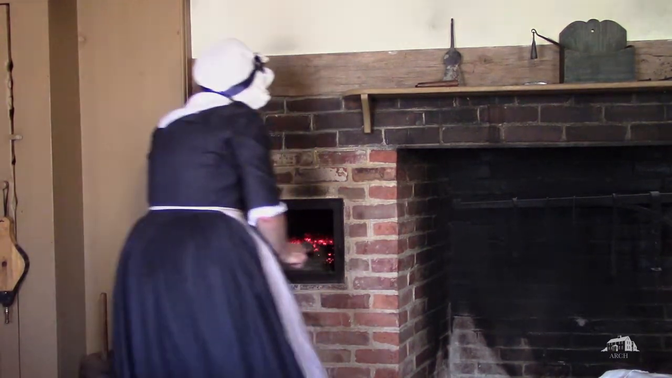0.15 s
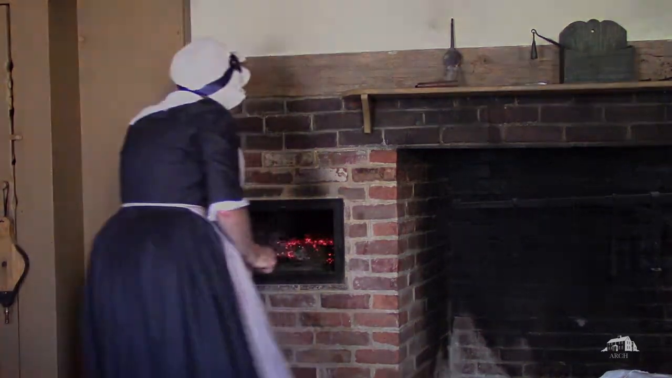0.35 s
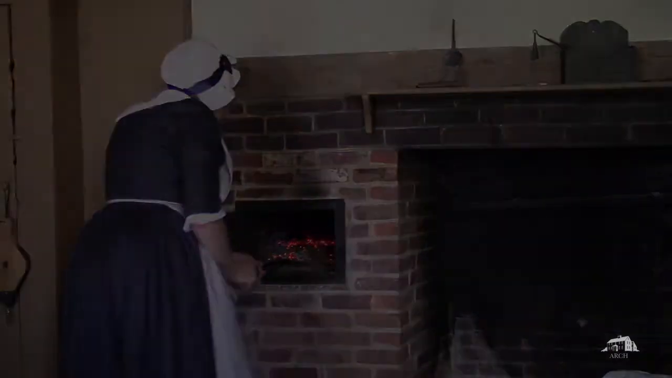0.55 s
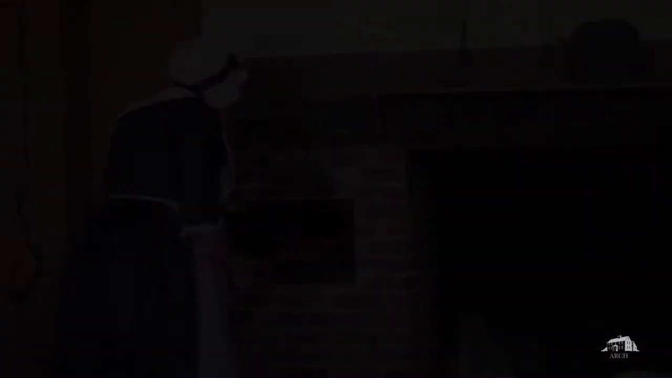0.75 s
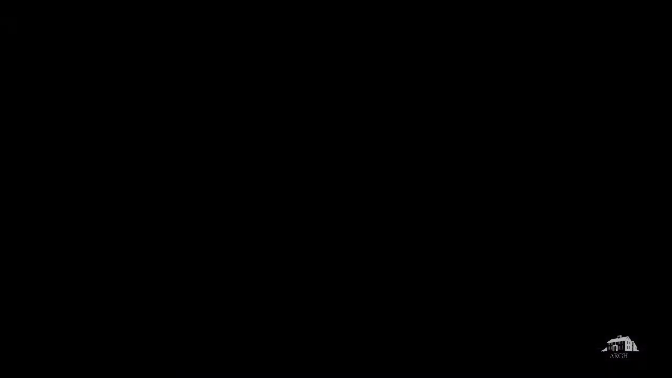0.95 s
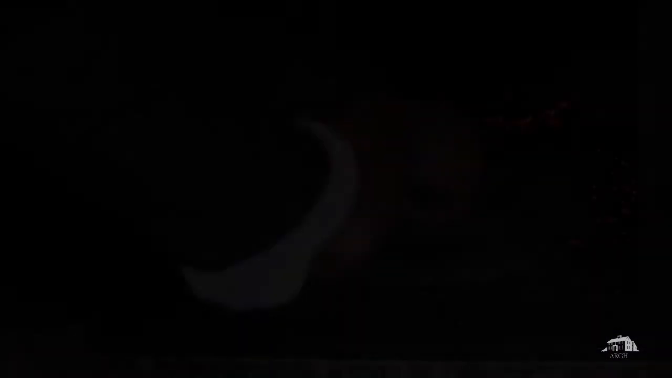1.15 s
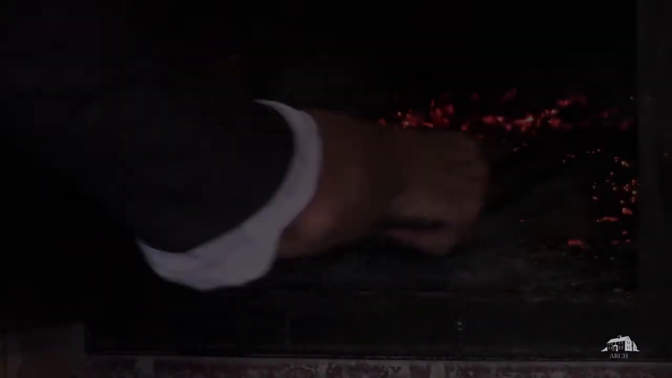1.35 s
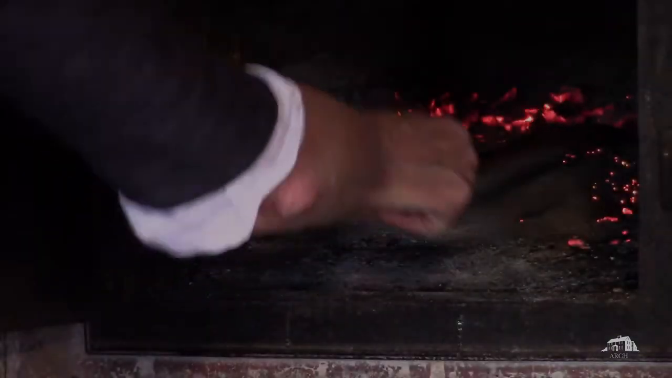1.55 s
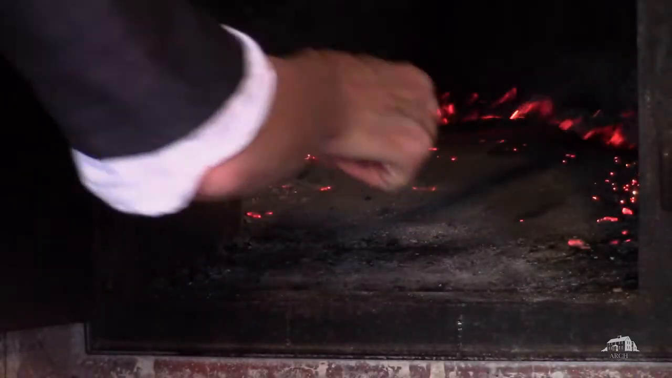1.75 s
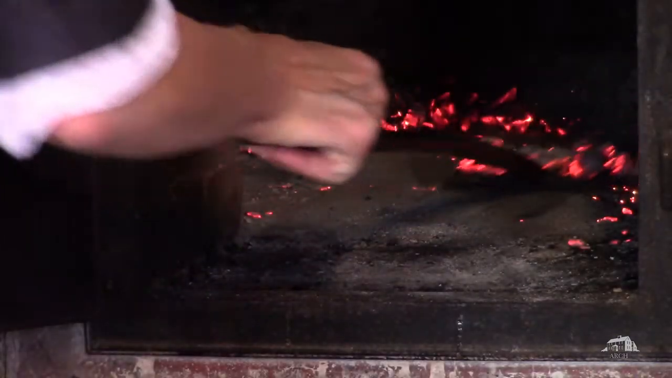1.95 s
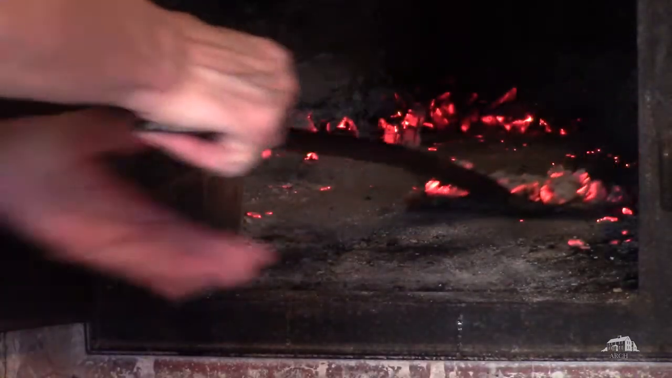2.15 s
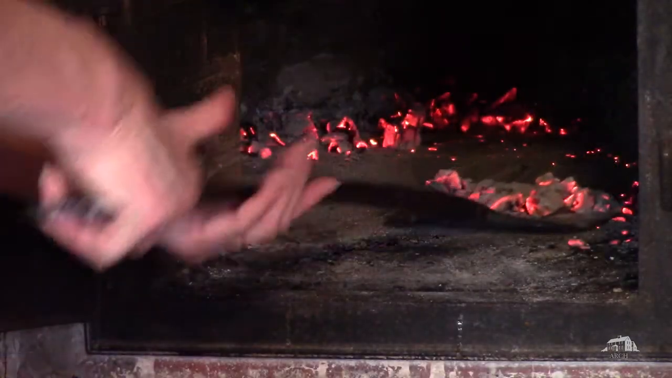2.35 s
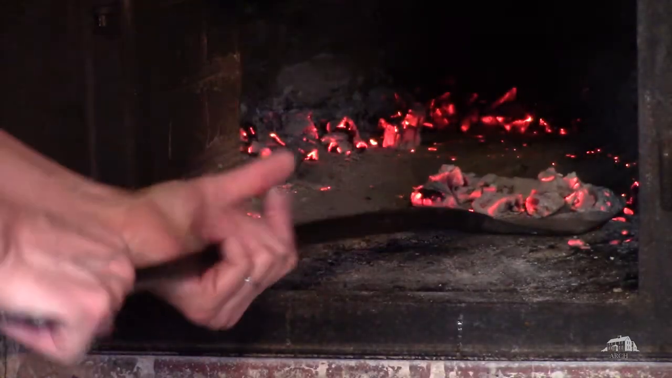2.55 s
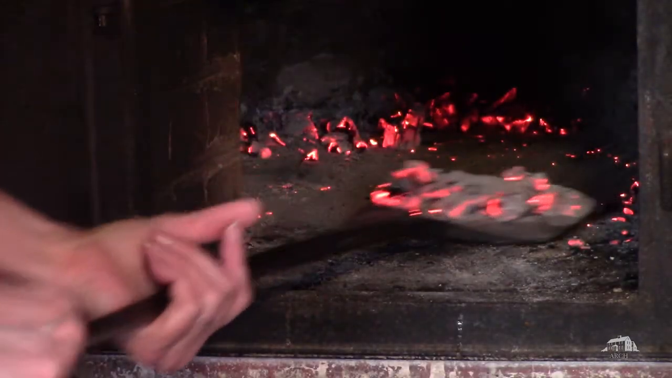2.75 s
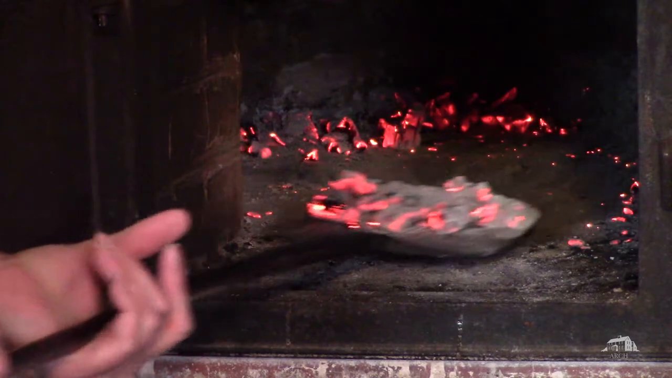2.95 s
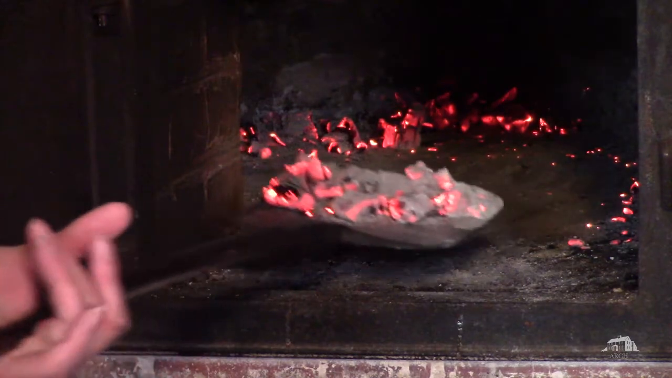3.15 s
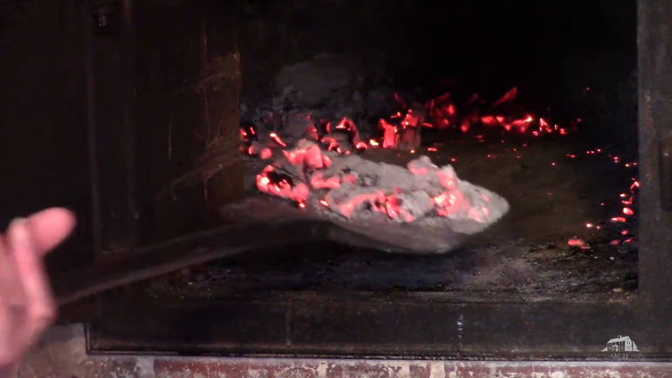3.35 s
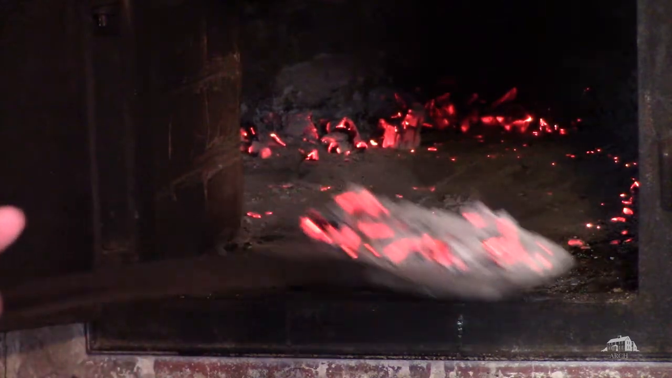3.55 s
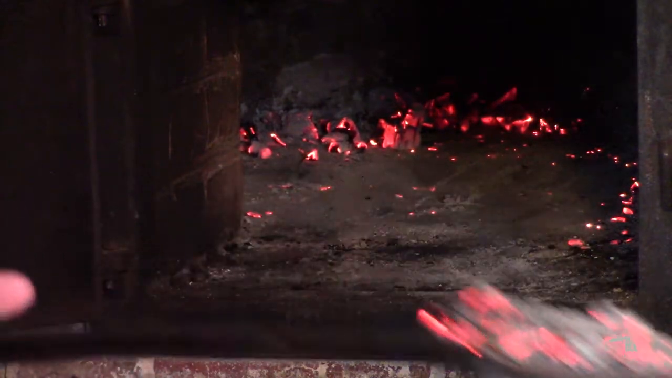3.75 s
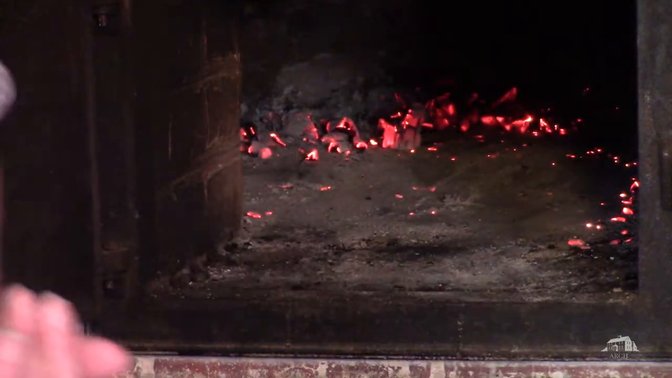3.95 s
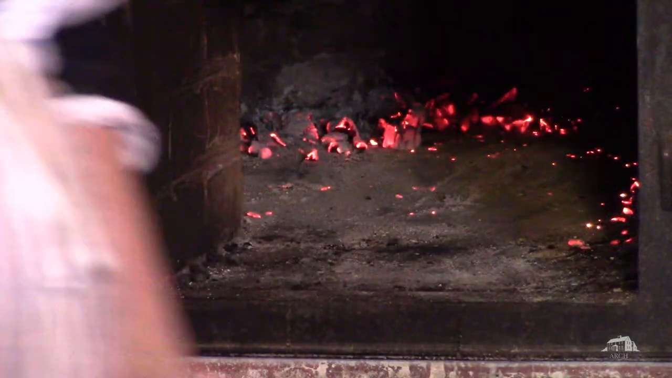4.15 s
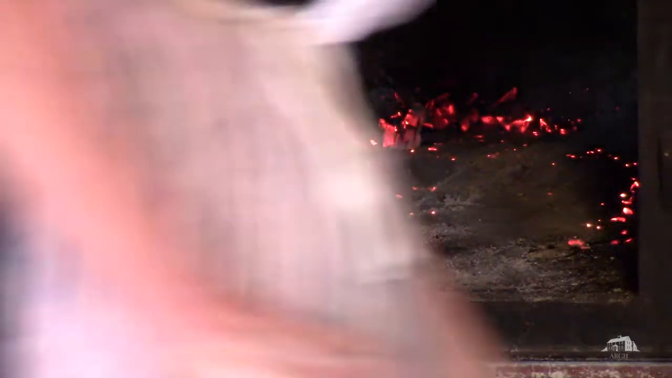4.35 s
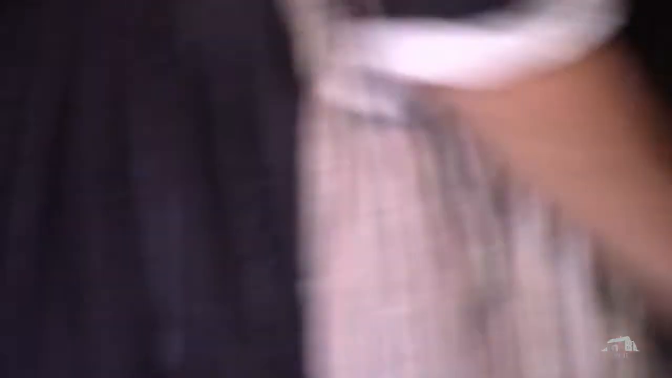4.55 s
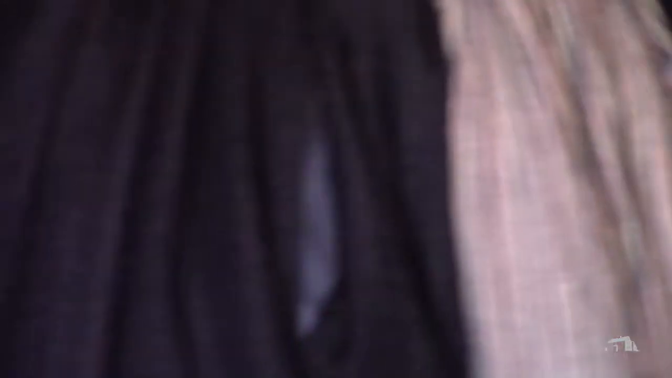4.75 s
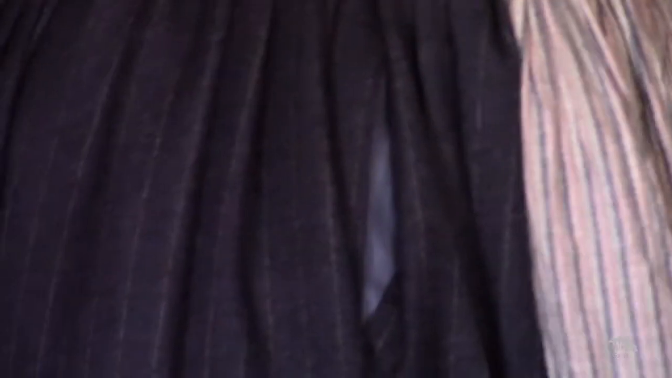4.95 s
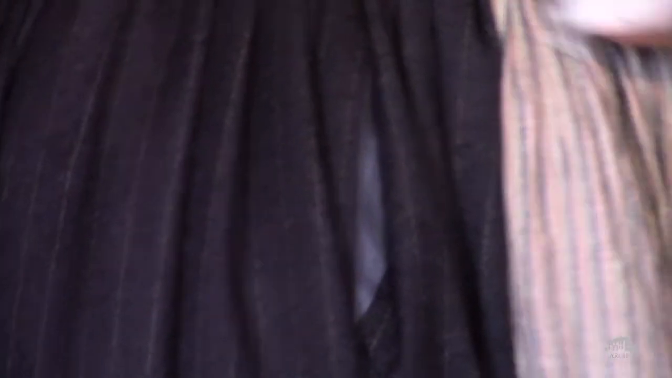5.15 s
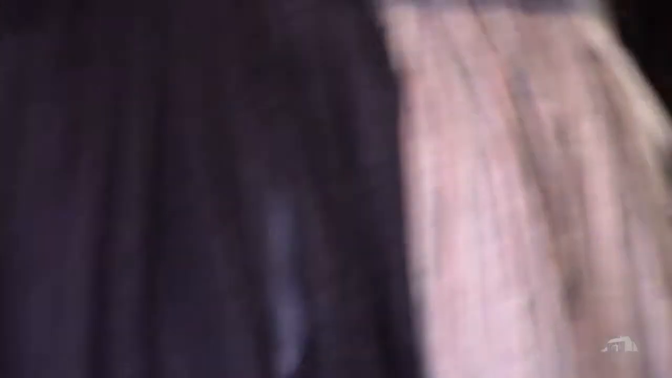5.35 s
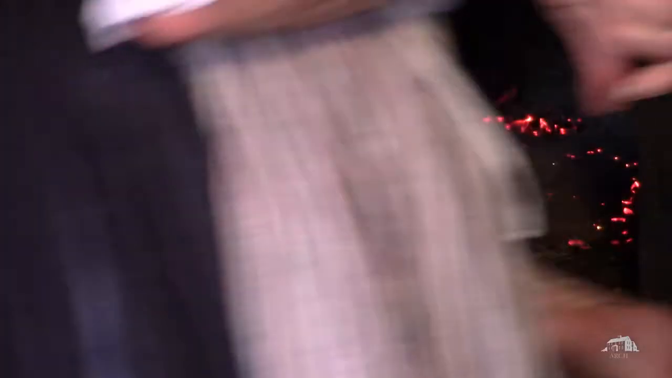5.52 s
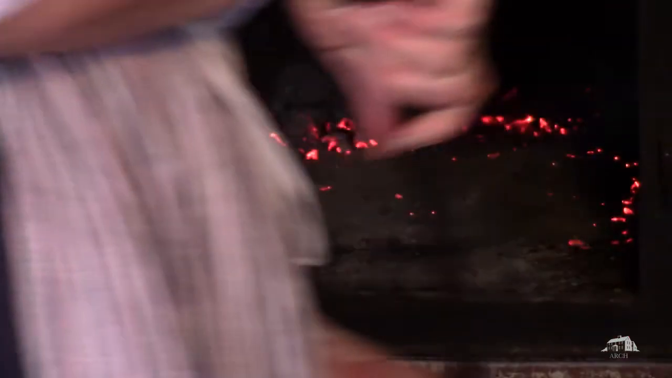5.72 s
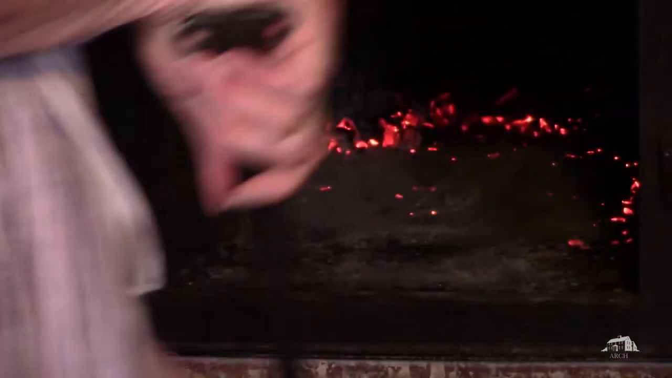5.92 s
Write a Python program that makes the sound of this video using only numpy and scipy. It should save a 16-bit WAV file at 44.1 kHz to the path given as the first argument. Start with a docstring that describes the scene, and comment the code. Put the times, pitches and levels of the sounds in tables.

```python
"""A footfall and a brief coal slide come first; then an iron shovel knocks and scrapes over a bread oven's
brick floor, feeding its plate modes with friction and blows until about 2.8 s. It is lifted out:
embers tick, coals are tipped off with a gritty rush of noise, shoes knock on floorboards.
Faint random ember ticks and steady room noise run throughout; a small kitchen answers with decaying noise.
A single microphone with little bass hears it all."""
import sys
import numpy as np
from scipy import signal
from scipy.fft import rfft, irfft, next_fast_len
from scipy.io import wavfile
from scipy.ndimage import map_coordinates

SR = 44100
rng = np.random.default_rng(int(sys.argv[2]) if len(sys.argv) > 2 else 0)


def store_wav(level_fs):
    """Save 16-bit WAV to argv[1]."""
    pcm = np.round(np.clip(np.atleast_2d(level_fs), -1, 1) * 32767)
    wavfile.write(sys.argv[1], SR, pcm.T.astype(np.int16))


def voltage_ratio(decibels):
    """Convert decibels (scalar or array-like) to amplitude ratios, 20 dB per decade."""
    exponent = np.asarray(decibels, float) / 20
    return 10 ** exponent


N = 268128


def unit(x):
    """Scaled to rms 1."""
    return x / np.sqrt(np.mean(x ** 2) + 1e-20)


def along(points, hz):
    """(Hz, value) points interpolated on a log frequency axis."""
    f, v = np.transpose(points)
    return np.interp(np.log(hz + 1), np.log(f + 1), v)


def wobble(knots_per_s, size=N):
    """Random curve: normal knots joined by straight lines."""
    knots = rng.standard_normal(int(size * knots_per_s / SR) + 4)
    return map_coordinates(knots, [np.arange(size) * knots_per_s / SR], order=1)


def coloured(spectrum, envelope):
    """White noise under an envelope, filtered by the spectrum at unit rms gain."""
    m = next_fast_len(N + 8192)
    gain = voltage_ratio(along(spectrum, np.fft.rfftfreq(m, 1 / SR)))
    noise = envelope * rng.standard_normal(N)
    return irfft(rfft(noise, m) * unit(gain), m)[:N]


def resonate(x, hz, width_hz):
    """One fixed mode; white noise of rms 1 leaves with rms 1."""
    r = np.exp(-np.pi * max(width_hz, 3) / SR)
    poles = [1, -2 * r * np.cos(2 * np.pi * hz / SR), r * r]
    return np.sqrt((1 - r * r) / 2) * signal.lfilter([1, 0, -1], poles, x)


def sliding_mode(x, hz, width_hz):
    """One mode with pitch given per sample; white noise of rms 1 leaves with rms 1."""
    r = np.exp(-np.pi * width_hz / SR)
    turn = np.exp(2j * np.pi * np.cumsum(hz) / SR)
    baseband = signal.lfilter([1], [1, -r], x * turn.conj())
    return np.sqrt(2 * (1 - r * r)) * (baseband * turn).real


def burst(t60_s, attack_s):
    """Noise that starts quickly and dies away exponentially."""
    t = np.arange(SR // 4) / SR
    return rng.standard_normal(len(t)) * voltage_ratio(-60 * t / t60_s) * (1 - np.exp(-t / attack_s))


def add(track, s, sound):
    """Mixes a sound into the track at time s."""
    part = track[round(s * SR):][:len(sound)]
    part += sound[:len(part)]


def above(hz, x):
    """Third-order high-pass."""
    return signal.sosfilt(signal.butter(3, hz, "high", fs=SR, output="sos"), x)


def peak(s, db, rise_db_per_s, fall_db_per_s, hold_s=0):
    """Level in dB that climbs to db at time s, holds, then sinks."""
    t = np.arange(N) / SR - s
    rise = rise_db_per_s * np.minimum(t, 0)
    fall = fall_db_per_s * np.maximum(t - hold_s, 0)
    return np.maximum(db + rise - fall, -120)


# shovel plate modes: [f/Hz, level/dB, gain per pressure/(dB/dB)]
BLADE_MODES = [(300, -18, -0.43), (390, -18.5, 0.18), (470.4, -12, -0.1), (616, -19.5, -0.43),
               (818, -10, 0), (1171, -12, 0.5), (1340, -6, -0.07), (1490, -9.5, 0.25), (1745, -5, -0.08),
               (2061, -7.5, 0.05), (2446, -11.5, 0.5), (2610, -7.5, 0.05), (3010, -9.5, 0),
               (3340, -11, 0.3), (3845, -10.5, 0.29), (3945, -7.5, 0.06), (4238, -10.5, -0.07),
               (4724, -10, 0.03), (5677, -5.5, 0.29), (5940, -9.5, -0.07), (6515, -15, 0.5),
               (6910, -15.5, 0.14), (7830, -13.5, -0.06), (8760, -14.5, 0.4), (9604, -12, 0.09),
               (10500, -18, -0.2)]
# blade strikes brick: [t/s, level/dB, dullness/dB]
BLOWS = [(0.312, -10, 6), (0.8738, -8.5, -17), (0.9393, -16.5, -14), (1.113, -32.5, 1.5),
         (1.4432, -30.5, -5), (1.813, -27.5, -2), (1.8333, -14, 2), (1.9926, -7.5, -10), (2.038, -17, -11),
         (2.068, -14, -9), (2.098, -11, -6), (2.178, -12, -7.5), (2.568, -27, -14), (2.58, -26, -3),
         (2.647, -34, -6.5), (2.659, -27, -10.5)]
# brick under iron: [f/Hz, relative density/dB]
GRIT_SPECTRUM = [(180, -48), (300, -15), (500, -3.5), (1500, 0), (3300, -8.5), (9000, -17), (16000, -30.5)]


def shovel():
    """Friction and blows feed every mode; the touching edge wanders, so each mode swells on its own."""
    lifted_s = 3.1
    end = round(lifted_s * SR)
    pressure_db, dull_db = (control[:end] for control in contact())
    # the edge catches on brick grains and crushes coal crumbs
    roughness = unit(voltage_ratio(wobble(70, size=end) + 2.64 * wobble(500, size=end)))
    catching = unit(roughness + 0.85 * crumbs(end))
    # weaker modes crowd between the strong ones
    lower_hz = np.linspace(930, 2300, num=12) + rng.uniform(-45, 47, size=12)
    crowd_hz = np.append(lower_hz, rng.uniform(2300, 15800, size=70))
    crowd = [(hz, min(along(GRIT_SPECTRUM, hz) - 5, -16), 0) for hz in crowd_hz]
    ring = np.zeros(end)
    for hz, db, favour in BLADE_MODES + crowd:
        low = 1 / (1 + (hz / 2200) ** 3)  # share of the dullness this mode feels
        # pressing hard bends the blade towards other modes
        drive_db = pressure_db + favour * (pressure_db + 28.5) + low * (dull_db - 3.5)
        wander_db = 3.6 * wobble(45, size=end) + 2.0 * wobble(11, size=end)
        force = voltage_ratio(drive_db + wander_db - 6.5) * catching * rng.standard_normal(end)
        for s, blow_level_db, blow_dull_db in BLOWS:
            blow_db = blow_level_db + favour * (blow_level_db + 12.5) + low * blow_dull_db
            blow_db += 2.4 * rng.standard_normal()
            add(force, s, voltage_ratio(blow_db - 2.5) * burst(t60_s=0.0088, attack_s=0.00017))
        # low modes slide in pitch as the loaded blade flexes
        pitch_hz = hz * (1 + 0.014 * low * wobble(9, size=end))
        width_hz = 20 + 0.0009 * hz  # higher modes lose energy faster
        ring += voltage_ratio(db) * sliding_mode(force, pitch_hz, width_hz)
    rubbing = voltage_ratio(pressure_db + 0.59 * dull_db - 7.0) * catching
    struck = np.pad(ring + floor_thud(end), (0, N - end))
    scrape = coloured(GRIT_SPECTRUM, np.pad(rubbing, (0, N - end)))
    return above(262, struck + scrape)  # a thin blade radiates no bass


def floor_thud(size):
    """The oven floor takes each blow: a noise burst through one broad resonance."""
    thud = np.zeros(size)
    for s, db, dull_db in BLOWS:
        add(thud, s, voltage_ratio(db + 0.7 * dull_db - 21.0) * burst(t60_s=0.3, attack_s=0.0014))
    return resonate(thud, hz=480, width_hz=194)


def crumbs(size):
    """Force envelope of separate grains: sudden, short, of very unequal size."""
    grains_per_s, decay_s = 300, 0.001
    hit = rng.random(size) < grains_per_s / SR
    strength = rng.exponential(size=size)
    return unit(signal.lfilter([1], [1, -np.exp(-1 / (decay_s * SR))], hit * voltage_ratio(4.6 * strength)))


# blade dragged on brick, one table a stroke: [t/s, level/dB]
DRAG_STROKES = [
    [(.315, -46), (.37, -45), (.44, -39), (.58, -51.5), (.66, -59)],
    [(.877, -31), (.94, -38), (1.0, -45.5), (1.13, -54), (1.26, -52.5), (1.34, -58)],
    [(1.445, -66), (1.56, -49), (1.6, -45), (1.8, -44), (1.82, -30.5), (1.97, -37.5), (2.04, -23.5),
     (2.16, -29), (2.2, -24), (2.3, -25.5), (2.355, -23), (2.405, -37), (2.5, -41), (2.56, -56.5),
     (2.8, -59.5)],
]


def drag():
    """Drag pressure in dB per sample: interpolated within strokes, silent between them."""
    t = np.arange(N) / SR
    s, db = np.transpose(np.concatenate(DRAG_STROKES))
    touching = sum((t >= rows[0][0]) & (t <= rows[-1][0]) for rows in DRAG_STROKES) > 0
    return np.where(touching, np.interp(t, s, db), -120)


# the edge digs in for a moment: [t/s, level/dB, dullness/dB]
DIGS = [(0.269, -40, -10), (0.393, -32.5, 10), (1.181, -36.5, 8.5), (1.594, -36, 5.5), (1.69, -36, -4),
        (1.728, -35.5, -1.5), (1.852, -20, 3.5), (1.949, -31, 16.5), (2.056, -21.5, -1),
        (2.079, -15, -13.5), (2.131, -14.5, -5), (2.682, -44, 16)]


def contact():
    """Pressure and dullness of the edge: drag, digs and skids add powers, the strongest sets the colour."""
    drag_db = drag()
    parts = [(drag_db, 3.5 - 0.2249 * (drag_db + 41))]  # harder is brighter
    for s, db, dull_db in DIGS:
        parts.append((peak(s, db, rise_db_per_s=449, fall_db_per_s=558), dull_db))
    for s, db, dull_db in BLOWS:  # after each blow the blade skids on
        parts.append((peak(s, db - 11.5, rise_db_per_s=SR, fall_db_per_s=491), dull_db))
    power = sum(voltage_ratio(2 * db) for db, dull_db in parts)
    dullness_db = sum(voltage_ratio(2 * db) * dull_db for db, dull_db in parts) / power
    return 10 * np.log10(power), dullness_db


# the edge sticks and slips in step with one mode: [t/s, f/Hz, level/dB]
SQUEALS = [(.313, 5677, -27), (0.319, 1340, -23), (.32, 1745, -23.5), (.317, 515, -28), (.38, 5677, -37.5),
           (.685, 2606, -51), (.9, 390, -37), (.874, 3945, -36), (0.875, 2610, -31), (.937, 5677, -34),
           (.948, 3945, -31), (1.17, 818, -41), (1.175, 1745, -42), (1.455, 2610, -48.5), (1.59, 4310, -44),
           (1.833, 1745, -22.5), (1.833, 1490, -25), (1.845, 5677, -22), (2.06, 5677, -19),
           (2.068, 3945, -19), (2.128, 8760, -28.5), (2.575, 3010, -43), (2.58, 4320, -48.5),
           (2.655, 6030, -43), (2.67, 626, -46), (2.668, 4330, -47)]


def squeals():
    """Stick-slip: a nearly pure tone catches, holds and lets go, unsteady in level and pitch."""
    rise_s, hold_s = 0.005, 0.033
    out, t = np.zeros(N), np.arange(SR // 8) / SR
    shape = np.sqrt(2) * (1 - np.exp(-t / rise_s)) * np.exp(-(t / hold_s) ** 3)
    for s, hz, db in SQUEALS:
        pitch_hz = hz * (1 + 0.0048 * wobble(85.0, size=len(t)))
        level = voltage_ratio(db + 2.2 * wobble(122, size=len(t)))
        add(out, s, level * shape * np.sin(2 * np.pi * np.cumsum(pitch_hz) / SR))
    return out


# ember and grit ticks: [t/s, level/dB, f/Hz]
TICKS = [(0.2028, -25, 6400), (0.605, -20, 3070), (0.7972, -34, 10500), (3.407, -35, 5900),
         (4.171, -37, 10500), (4.8097, -27, 6960), (4.818, -21, 9100), (4.8576, -29, 4420),
         (4.878, -25.5, 6200), (4.885, -25, 9300), (4.9851, -31.5, 3070), (5.156, -33.5, 7800),
         (5.196, -28.5, 10500), (5.7133, -32.5, 8900), (5.768, -37.5, 7640)]


def ticks():
    """A brittle snap: a broad crack around the pitch and a short glassy ring at it."""
    out = np.zeros(N)
    for s, db, hz in TICKS + crackle():
        snap = burst(t60_s=0.013, attack_s=0.0001)
        snap = snap + 0.38 * burst(t60_s=0.058, attack_s=0.00076)  # crumbs after the break
        crack = above(0.11 * hz, resonate(snap, 1.01 * hz, width_hz=0.64 * hz))
        glass = resonate(snap, hz, width_hz=240)
        add(out, s, voltage_ratio(db - 7.5) * (crack + 0.37 * glass))
    return out


def crackle():
    """Rows of faint, high ember ticks at random times, levels and pitches."""
    ticks_per_s = 6.2
    s, size, pitch = rng.random((round(ticks_per_s * N / SR), 3)).T
    return list(zip(s * N / SR, -46 + np.log(1 - size), 5000 + 6000 * pitch))


# coals and ash sliding: [t/s, hold/s, level/dB]
SLIDES = [(0, 0.0077, -39.5), (4.736, 0.022, -56.5), (4.805, 0.082, -39.5), (5.651, 0.029, -54.5)]
# sliding coals: [f/Hz, relative density/dB]
ASH_SPECTRUM = [(100, -47), (200, -7.5), (1340, -1.5), (6000, -7.5), (16000, -19)]


def pour():
    """Loose coals and ash slide in clumps: noise of unsteady level, then a trickle of crumbs."""
    sliding = np.zeros(N)
    for s, hold_s, db in SLIDES:
        sliding += voltage_ratio(peak(s, db, 8000, 341, hold_s))
        sliding += voltage_ratio(peak(s, db - 16, SR, 35, hold_s))  # the last crumbs
    clumps = voltage_ratio(2.0 * wobble(120) + 3.0 * wobble(900))
    return coloured(ASH_SPECTRUM, sliding * clumps)


# footfalls: [t/s, level/dB, board f/Hz, heel level re footfall/dB]
STEPS = [(0.023, -24, 436, -17.5), (2.926, -46.5, 202, -11), (4.2565, -28, 480, -20),
         (4.272, -29.5, 480, -30), (4.3455, -34, 457, -1), (4.367, -40, 445, -14),
         (5.3703, -28.5, 300, -10), (5.559, -35, 233, -23), (5.586, -41, 480, -37)]


def steps():
    """A shoe thumps a floorboard, which booms and rattles briefly; the heel adds a knock and a click."""
    out = np.zeros(N)
    for s, db, hz, heel_db in STEPS:
        rattle = burst(t60_s=0.22, attack_s=0.001)
        rattle[0] += 9  # the first contact is one clean push
        board = resonate(resonate(rattle, hz, width_hz=70), hz, width_hz=710)
        boom = resonate(resonate(rattle, hz=252, width_hz=640), hz=300, width_hz=320)
        strike = burst(t60_s=0.22, attack_s=0.0003) + 3.0 * burst(t60_s=0.035, attack_s=0.00038)
        knock = resonate(resonate(strike, hz=1450, width_hz=450), hz=1500, width_hz=2800)
        heel = knock + 0.5 * resonate(strike, hz=2600, width_hz=1900)
        add(out, s, voltage_ratio(db - 23.5) * (board + 1.51 * boom) + voltage_ratio(db + heel_db - 11.0) * heel)
    return out


# kitchen decay: [f/Hz, t60/s]
KITCHEN_DECAY = [(200, 0.62), (1000, 0.48), (4000, 0.26), (12000, 0.022)]


def kitchen(x):
    """Noise tails in which each frequency dies at its own speed; a new tail every quarter second."""
    delay_s = 0.006
    out, hop = np.zeros(N + SR), SR // 4
    for start in range(0, N, hop):
        hz, t, z = signal.stft(rng.standard_normal(SR // 2), SR, nperseg=256)
        decay = voltage_ratio(-60 * t / along(KITCHEN_DECAY, hz)[:, None])
        tail = signal.istft(z * decay, SR, nperseg=256)[1]
        answer = signal.fftconvolve(x[start:start + hop], tail / np.linalg.norm(tail))
        add(out, start / SR + delay_s, answer)
    return out[:N]


# room noise: [f/Hz, relative density/dB]
AIR_SPECTRUM = [(15, -41), (25, -16), (111, -14), (349, -3), (952, 0.5), (1600, -4.5), (10400, -16),
                (15200, -23), (16500, -48)]


def air():
    """Steady room noise: stationary noise through a fixed spectrum."""
    return coloured(AIR_SPECTRUM, voltage_ratio(-56))


def scene():
    """All sources reach one microphone, which hears little of their bass."""
    iron, snaps, shoes, coals = shovel() + squeals(), ticks(), steps(), pour()
    echo = kitchen(voltage_ratio(-10.0) * iron + voltage_ratio(-27.0) * snaps + voltage_ratio(-12.0) * shoes + voltage_ratio(-15.5) * coals)
    mono = above(163, iron + snaps + shoes + coals + echo) + air()
    return np.tile(mono, (2, 1))


def roll_off(x):
    """The treble ends steeply here."""
    return signal.sosfilt(signal.butter(12, 16650, fs=SR, output="sos"), x)


def record(dry):
    """A steep low-pass limits the band; very faint unrelated noise is added to left and right."""
    top_hz = 15900
    limited = signal.sosfilt(signal.ellip(8, 0.5, 50, top_hz, fs=SR, output="sos"), dry)
    faint_noise = voltage_ratio(-80.0) * rng.standard_normal(dry.shape)
    return roll_off(limited + faint_noise)


dry = scene()
out = record(dry)
store_wav(out)
```